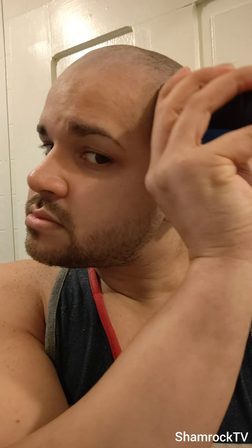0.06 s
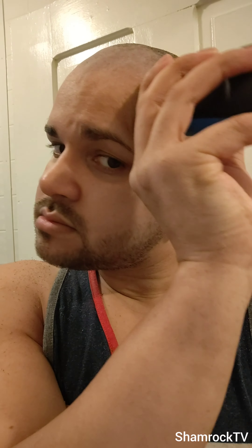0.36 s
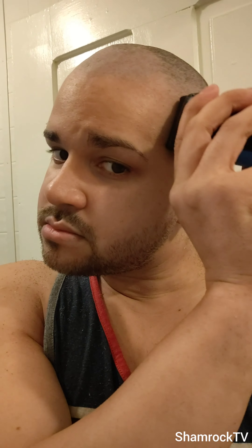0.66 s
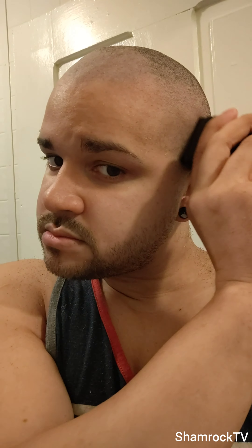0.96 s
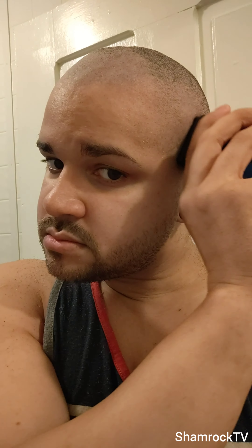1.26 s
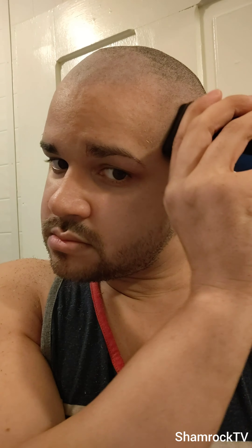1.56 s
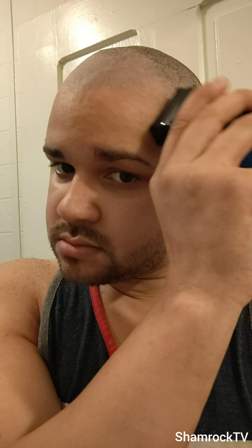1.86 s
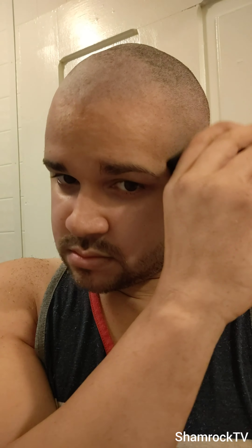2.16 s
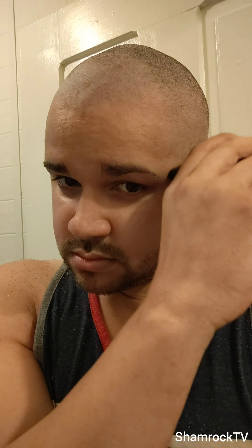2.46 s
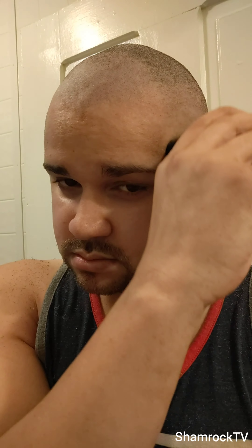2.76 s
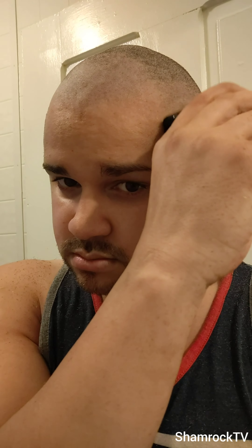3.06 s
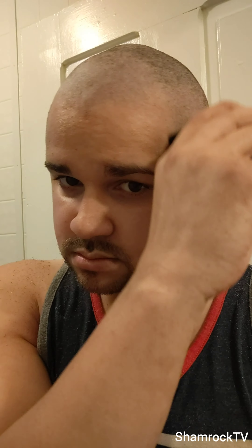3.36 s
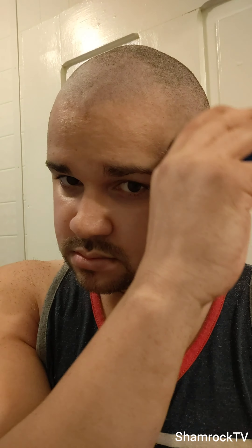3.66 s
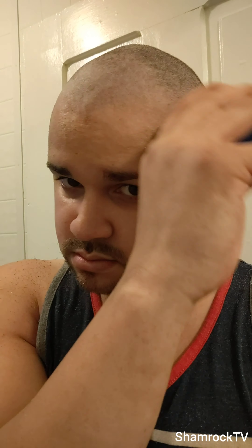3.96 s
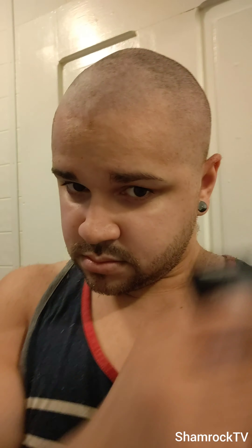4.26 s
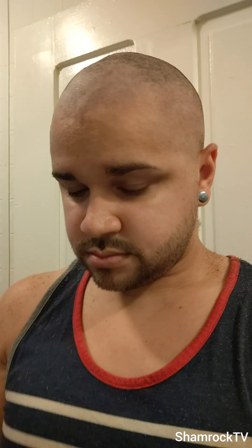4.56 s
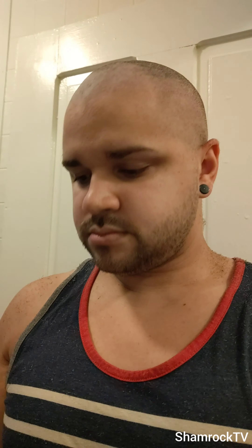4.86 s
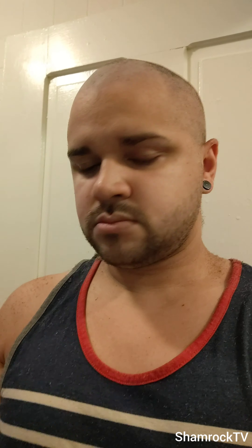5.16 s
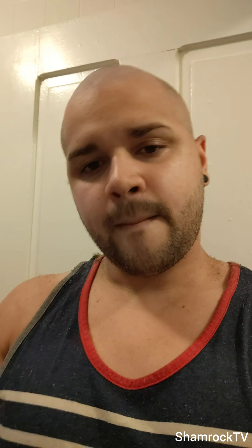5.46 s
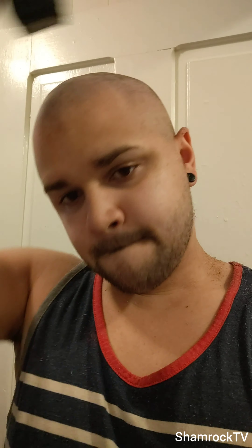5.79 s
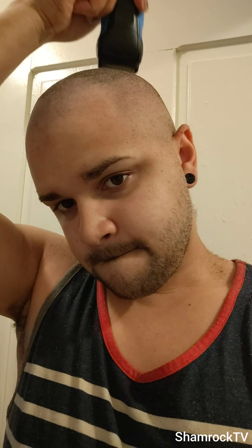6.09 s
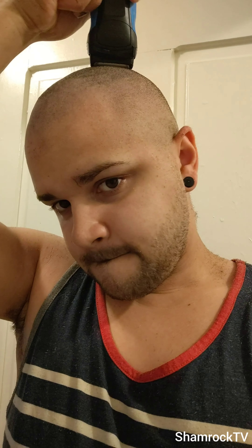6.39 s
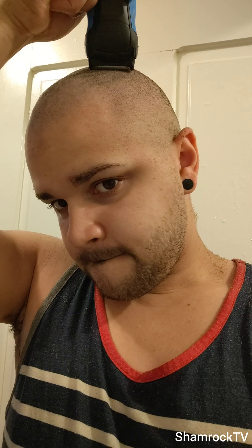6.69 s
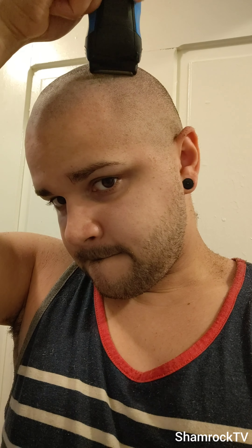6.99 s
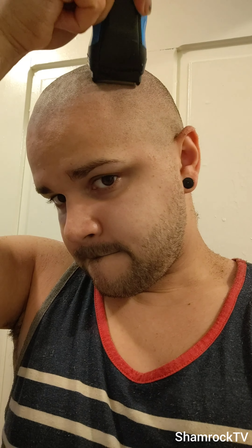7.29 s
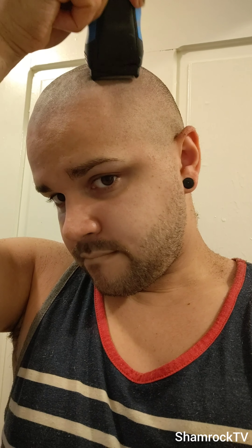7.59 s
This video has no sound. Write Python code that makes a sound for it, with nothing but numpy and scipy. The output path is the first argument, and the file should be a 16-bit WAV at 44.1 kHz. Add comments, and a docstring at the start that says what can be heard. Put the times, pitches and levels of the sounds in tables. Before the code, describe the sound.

Steady buzzing of an electric shaver with raspy strokes through head stubble, growing louder and rougher near the end, in a small echoing bathroom.

```python
"""A small bathroom, a phone's stereo microphone at arm's length from an electric foil shaver on a scalp.
The shaver rubs along the temple, runs free for two seconds as it changes hands close to the microphone,
then bites into the thicker stubble on the crown. The motor shakes the case, the cutters chatter under
the foil and snip hairs on each stroke; drag slows and roughens it all. The walls echo, and beneath it
lie a faint room rumble and a few soft bumps of the hand on the phone."""
import sys
import numpy as np
from scipy import signal
from scipy.fft import rfft, irfft
from scipy.io import wavfile
from scipy.ndimage import uniform_filter1d, map_coordinates

SR = 44100
rng = np.random.default_rng(int(sys.argv[2]) if len(sys.argv) > 2 else 0)


def unload_wav(signal):
    """Save mono or channel-first audio to the path in sys.argv[1] as 16-bit WAV at rate SR, clipped to [-1, 1]."""
    wavfile.write(
        sys.argv[1],
        SR,
        np.round(np.clip(np.atleast_2d(signal).T, -1, 1) * 32767).astype(np.int16),
    )


N = 336483
T = np.arange(N) / SR
LIFT_S, LAND_S = 4.08, 6.21  # the foil leaves the temple, then lands on the crown


def amp(db):
    """Decibels to gain."""
    return 10 ** (np.asarray(db) / 20)


def unit(x):
    """Scale to rms 1."""
    return x / np.sqrt(np.mean(x ** 2))


def curve(rows):
    """A (time, value) table, sample by sample."""
    return np.interp(T, *np.transpose(rows))


def ramp(middle_s, takes_s):
    """A steady move from 0 to 1."""
    return np.clip((T - middle_s) / takes_s + .5, 0, 1)


def swell(middle_s, width_s):
    """A smooth rise to 1 and fall back."""
    return np.exp(-((T - middle_s) / width_s) ** 2)


def walk(rate_hz):
    """Smooth random wandering with rms 1."""
    hold = max(int(SR / rate_hz), 2)
    steps = np.repeat(rng.standard_normal(N // hold + 1), hold)
    return unit(uniform_filter1d(uniform_filter1d(steps, hold), hold)[:N])


def bins(x):
    """Frequency of each spectral bin of x, kept just above zero."""
    return np.fft.rfftfreq(x.shape[-1], 1 / SR) + 1e-3


def shape(x, gain):
    """Filter by one gain per bin."""
    return irfft(rfft(x) * gain, x.shape[-1])


def response(points):
    """Gain per bin through (frequency [Hz], level [dB]) points."""
    hz, db = np.transpose(points)
    return amp(np.interp(np.log(bins(T)), np.log(hz), db))


def stroke(turns, depth, uneven):
    """The cutters sweep out and back once a turn, one way harder than the other."""
    return np.exp(depth * np.cos(4 * np.pi * turns) + uneven * np.cos(2 * np.pi * turns))


def buzz(turns, on_skin, pressed):
    """Upper orders of the housing: skin damps some, loose parts make all flutter."""
    # housing spectrum, relative: (order, running free [dB], resting on skin [dB], pressed hard [dB])
    orders = [(6, -26, -15, -26.5), (7, -5.5, -15.5, -14), (8, -3.5, -2.5, -11), (9, -6, -8, -5),
              (10, -11, -4, -27), (11, -5, -12, -13), (12, -1.5, -3, -5.5), (13, -4, -11, 1.5),
              (14, -3.5, -5, -7), (15, -2, -5.5, 2.5), (16, -14, -12, -9), (17, -6.5, -3.5, -11.5),
              (18, -18, -15.5, -7.5), (19, -14.5, -15.5, -17), (20, -3, -14, -9.5), (21, -6.5, -18, -33),
              (22, -1.5, -9.5, -12.5), (23, -0.5, -16.5, -17), (24, -8, -13.5, -14.5), (25, -5, -17, -32),
              (26, -16, -28, -27), (27, -7, -22, -35), (28, -16.5, -21, -40)]
    out = 0
    for order, free_db, resting_db, pressed_db in orders:
        skin_db = resting_db + pressed * (pressed_db - resting_db)
        db = on_skin * skin_db + (1 - on_skin) * free_db
        flutter_db = 1.8 * walk(7) + 1.3 * walk(35)
        # each order starts at a widely scattered phase and wanders a little, giving an even buzz
        phase = 1.8 * rng.standard_normal() + .45 * walk(10)
        out = out + amp(db + flutter_db) * np.cos(2 * np.pi * round(order) * turns + phase)
    return out / np.sqrt(uniform_filter1d(out ** 2, SR // 4))


def chatter(turns, shift_hz=8, orders=104, size=4096):
    """The cutters cross the same foil holes every turn: a pattern of ticks that repeats and shifts."""
    # ring of the foil under the cutters: (frequency [Hz], level [dB])
    foil = [(3400, -15), (4100, -4), (5200, -7.5), (6500, -2), (8000, -2.5), (9200, 0), (9660, 3.5),
            (10400, 1), (12000, -2), (15000, -11.5)]
    ticks = 0
    for _ in range(3):
        pattern = irfft(np.exp(2j * np.pi * rng.random(orders)), size)
        ticks = ticks + np.interp(turns % 1, np.arange(size) / size, pattern) * walk(shift_hz)
    ticks = ticks / np.sqrt(uniform_filter1d(ticks ** 2, SR // 50))
    return unit(shape(ticks * stroke(turns, depth=0.97, uneven=0.52), response(foil)))


def stubble(turns, spread_db=2.0, catch_db=1.35):
    """Hairs are snipped in dense, uneven clicks, slightly bunched on each stroke."""
    # rasp of hair in the foil, at the temple and on the crown: (frequency [Hz], level [dB])
    temple = [(100, -66), (450, -15.5), (780, -3), (1100, 3), (1900, 8), (2700, 1.5), (3300, 0.5),
              (5000, -8), (7000, 0), (9300, 0.5), (13500, -4), (15500, -17.5)]
    crown = [(100, -64), (450, -29.5), (1150, -12), (1900, -1), (2600, -16.5), (3150, -10), (4000, -16.5),
             (5700, -18), (7000, -11.5), (9600, -11), (10400, -6.5), (12300, -17), (13200, -24),
             (15500, -25)]
    snips = rng.standard_normal(N) * amp(spread_db * np.minimum(rng.exponential(size=N), 6))
    snips = snips * stroke(turns, depth=0.088, uneven=0.026) * amp(catch_db * walk(70))
    at_temple, on_crown = (unit(shape(snips, response(colour))) for colour in (temple, crown))
    return np.where(T < LAND_S, at_temple, on_crown)


def hum(turns, grips, crown, near, trim_db=-4.0):
    """The lowest orders, from the swinging mass; they tremble with the grip, alike at both ports."""
    # orders 1 to 5: (in fingertips [dB], in fist [dB], in other hand [dB],
    # added on the crown [dB], added at the close pass [dB])
    levels = [(-78, -62.5, -80, -14, -14), (-69.5, -66.5, -66, -5, 14.5), (-68, -64, -64.5, -9.5, -4.5),
              (-72, -63, -69.5, 3.5, -0.5), (-62.5, -60.5, -73, 11, -9.5)]
    out = 0
    for order, db in enumerate(np.array(levels) @ np.array([*grips, crown, near]), 1):
        tremble_db = .9 * walk(16) + 2.6 * walk(110)
        phase = 2 * np.pi * (order * turns + rng.random()) + 0.25 * walk(100)
        out = out + np.sqrt(2) * amp(trim_db + db + tremble_db) * np.cos(phase)
    return out


def direct(x, beam_hz=6000):
    """The straight path reaches the left port first; the treble is beamed past the microphone."""
    # the shaver's direction: (time [s], lead of the left port [ms])
    lead = [(0, 0.15), (3.9, 0.24), (4.3, 0.016), (5.3, 0.082), (6.0, 0.15), (6.5, 0.45), (7.63, 0.38)]
    right = shape(x, 1 / np.hypot(1, bins(x) / beam_hz))
    left = map_coordinates(right, [(T + curve(lead) / 1000) * SR], order=3, mode="nearest")
    return np.array([left, right])


def bathroom(x, t60_s=0.45, drift_hz=5.0, patterns=4):
    """Echoes off close walls; their pattern shifts as the hand moves, so overtones swell and fade."""
    t = np.arange(SR // 2) / SR
    decay = np.exp(-np.log(1000) * t / t60_s) * (t > .003)
    tails = rng.standard_normal((patterns, 2, len(t))) * decay
    tails /= np.sqrt(np.sum(tails ** 2, axis=-1, keepdims=True))
    shares = np.array([walk(drift_hz) for _ in tails])
    shares /= np.sqrt(np.sum(shares ** 2, axis=0))
    echoes = [signal.fftconvolve(x[None], tail, axes=1)[:, :N] for tail in tails]
    return sum(share * echo for share, echo in zip(shares, echoes))


def ports(x):
    """Each microphone port has its own colour; the right one is much brighter."""
    # balance of the ports: (frequency [Hz], left minus right [dB])
    balance = [(600, 0.5), (1150, 1), (1700, -9.5), (2450, 1), (3300, -3.5), (5000, 1.5), (6500, -2.5),
               (8500, -11.5), (10500, -18), (12500, -13), (15000, -4)]
    ratio = response(balance)
    return shape(x, np.array([ratio, np.ones_like(ratio)]) * np.sqrt(2 / (1 + ratio ** 2)))


def facing(x, grips, near, pressed, scrape_db, bite_s=0.095, span_s=0.17):
    """Each part of the shaver sounds in its own band, as loud as the grip and angle let it."""
    # borders of the bands of case, cap, frame, cutters and foil: (frequency [Hz])
    edges = [800, 1350, 1790, 2600, 5500, 20000]
    # a row for each of those parts: (in fingertips [dB], in fist [dB], in other hand [dB], added on
    # the crown [dB], at the close pass [dB], under a hard press [dB], share of a scrape's drag [ratio])
    levels = [(-57.5, -48, -48, -.5, -3.5, 1, 0.041), (-45.5, -48.5, -48, 9, 1, -1.9, 0.058),
              (-39.5, -48.5, -37.5, 2.5, 2, -1.4, .3), (-55, -47, -42.5, 5, 8.5, -0.41, 0.36),
              (-43.5, -41.5, -42, 10.5, 5.5, -1.2, 0.54)]
    bite = 1 - np.exp(-np.maximum(T - LAND_S, 0) / bite_s)  # the foil sinks into the crown's stubble
    levels_db = np.array(levels) @ np.array([*grips, bite, near, pressed, scrape_db])
    below = [1 / (1 + (bins(x) / hz) ** 40) for hz in edges]
    bands = [shape(x, upper - lower) for lower, upper in zip(below, below[1:])]
    powers = [uniform_filter1d(band.mean(axis=0) ** 2, int(span_s * SR)) for band in bands]
    gains = amp(levels_db) / np.sqrt(powers)
    low = amp(-6) * gains[0] * shape(x, below[0])  # the little rasp below the case's band follows it
    return low + sum(band * gain for band, gain in zip(bands, gains))


def room_tone(rumble_db=-74, fan_hz=237, fan_db=-77):
    """A faint rumble with one wavering fan tone."""
    # quiet of the room: (frequency [Hz], level [dB])
    quiet = [(20, -27), (55, 0), (95, 3.5), (190, 0), (240, 3), (330, 1), (700, -9), (2000, -52.5)]
    noise = rng.standard_normal(N) + .8 * rng.standard_normal((2, N))
    fan = np.sqrt(2) * np.sin(2 * np.pi * fan_hz * T + 0.32 * walk(9))
    rumble = unit(shape(noise, response(quiet)))
    return amp(rumble_db + walk(6.1)) * rumble + amp(fan_db) * fan


def housing_rings(turns, flutter_db=3.0):
    """The grip shifts and lets the housing ring on one order of the motor, then fade again."""
    # swells of single orders: (time [s], half length [s], order, level at the top [dB])
    rings = [(1.41, 0.82, 5, -55.5), (1.15, 0.19, 12, -43), (1.27, .25, 31, -52), (1.36, .25, 24, -43),
             (1.517, 0.34, 12, -38.5), (1.514, 0.072, 11, -35.5), (2.4, 0.37, 8, -50.5),
             (3.301, 0.19, 3, -60), (3.302, 0.18, 17, -58), (4.477, 0.07, 8, -44.5),
             (4.493, 0.056, 12, -42), (4.831, 0.11, 12, -42), (5.0, .35, 67, -56), (5.09, 0.11, 22, -34),
             (5.388, 0.37, 8, -44.5), (5.6, 0.15, 12, -34.5), (6.14, .14, 14, -34), (7.194, .12, 12, -33),
             (7.402, .35, 8, -47)]
    phases = rng.random(100)  # each order keeps its own
    out = 0
    for time_s, width_s, order, db in rings:
        tone = np.cos(2 * np.pi * (round(order) * turns + phases[round(order)]))
        out = out + amp(db) * swell(time_s, width_s) * tone
    return np.sqrt(2) * out * amp(flutter_db * walk(35))


def handling_bumps(hz=95, ring_s=0.05):
    """The hand bumps the phone, whose body gives a dull, quickly damped throb."""
    # soft bumps: (time [s], level [dB])
    bumps = [(4.099, -61), (4.199, -73), (4.529, -64), (4.639, -63), (7.0, -67)]
    out = 0
    for time_s, db in bumps:
        age = np.maximum(T - time_s, 0)
        out = out + amp(db) * np.exp(-age / ring_s) * np.sin(2 * np.pi * hz * age)
    return out


def scene(motor_wet_db=6.5, rasp_wet_db=5.0, temple_drag_db=-6, air_drag_db=-12, pass_pan_db=3.5):
    """One motor drives the shaver's layers; grip, skin and distance to the microphone set the levels."""
    # motor speed: (time [s], turn rate [Hz])
    speed = [(0.0, 135.7), (0.25, 132.5), (0.91, 141.7), (1.53, 141.2), (1.87, 143.7), (2.06, 141.1),
             (2.53, 143.5), (3.19, 139.1), (3.61, 143.4), (3.8, 144.3), (3.91, 141.2), (4.1, 143.2),
             (4.42, 144.5), (6.16, 143.3), (6.27, 139.7), (7.12, 132.3), (7.42, 133.5), (7.63, 136.9)]
    # the foil scrapes through patches of stubble: (time [s], half length [s], extra drag [dB])
    scrapes = [(0.617, 0.063, 5.5), (1.86, 0.15, 4), (2.779, 0.21, 5), (3.187, 0.15, 5), (3.94, 0.13, 5),
               (6.774, .42, 5.5)]
    hz = curve(speed)
    pressed = np.clip((139 - hz) / 5, 0, 1)  # a hard press slows the motor
    temple, crown = 1 - ramp(LIFT_S, takes_s=0.11), ramp(LAND_S, takes_s=0.026)
    on_skin = temple + crown
    closing, handover = ramp(0.78, takes_s=3.7), ramp(5.26, takes_s=0.15)
    grips = [1 - closing, closing - handover, handover]  # fingertips, fist, other hand
    near = swell(5.02, width_s=0.6)  # between the hands the shaver passes close to the right port
    pan = amp(pass_pan_db * np.array([-near, near]) / 2)

    # drag sets rasp over buzz; in the air only the cutters' own faint hiss on the foil is left
    scrape_db = sum(db * swell(time_s, width_s) for time_s, width_s, db in scrapes)
    drag = amp(temple * temple_drag_db + (1 - on_skin) * air_drag_db + scrape_db)
    wobble = .0005 * walk(18) + .001 * on_skin * walk(30)
    jitter = (.00055 + .0019 * drag) * walk(200)  # drag makes the strokes uneven
    turns = np.cumsum(hz * (1 + wobble)) / SR + jitter

    chatter_db = -3.5 - 3 * on_skin  # skin on the foil muffles the cutters
    motor = buzz(turns, on_skin, pressed) + amp(chatter_db) * chatter(turns)
    # hairs snap all over the foil, so the walls bring each port its own mix of them
    rasp = direct(stubble(turns)) + amp(rasp_wet_db) * np.array([stubble(turns), stubble(turns)])
    shaver = unit(direct(motor) + amp(motor_wet_db) * bathroom(motor)) + drag * unit(rasp)
    at_phone = facing(pan * ports(shaver), grips, near, pressed, scrape_db)
    ringing = pan * ports(direct(housing_rings(turns)))
    return at_phone + ringing + hum(turns, grips, crown, near) + handling_bumps() + room_tone()


def record(dry, cutoff_hz=15700):
    """The phone cuts the top treble steeply."""
    return signal.sosfilt(signal.ellip(10, .1, 80, cutoff_hz, fs=SR, output="sos"), dry)


dry = scene()
out = record(dry)
unload_wav(out)
```